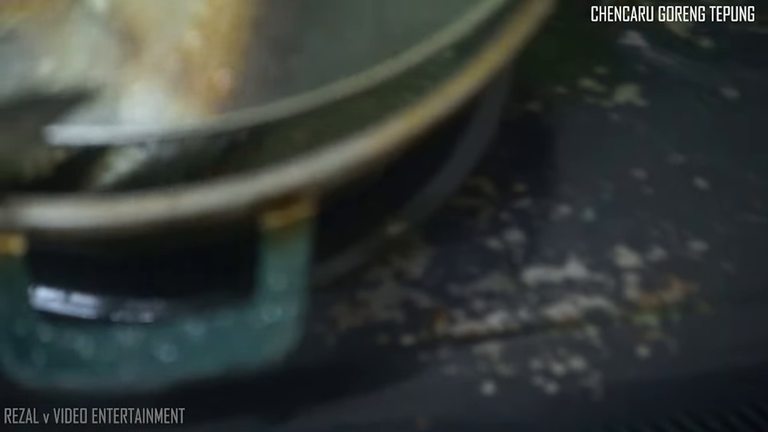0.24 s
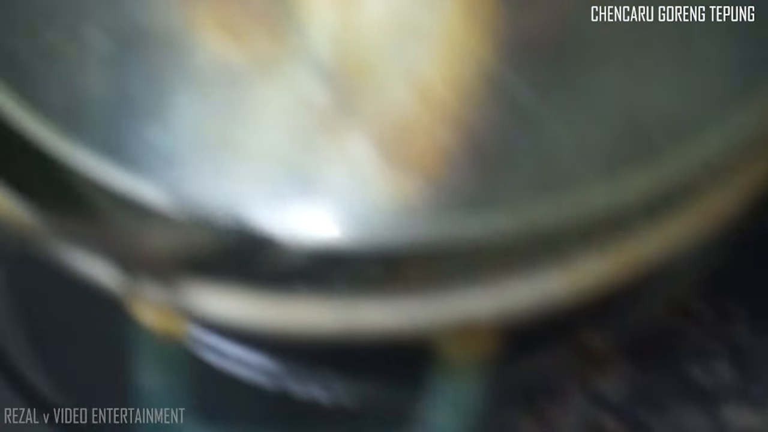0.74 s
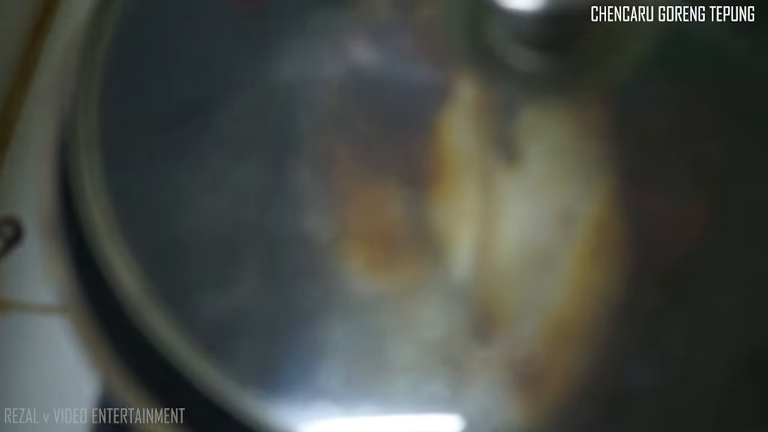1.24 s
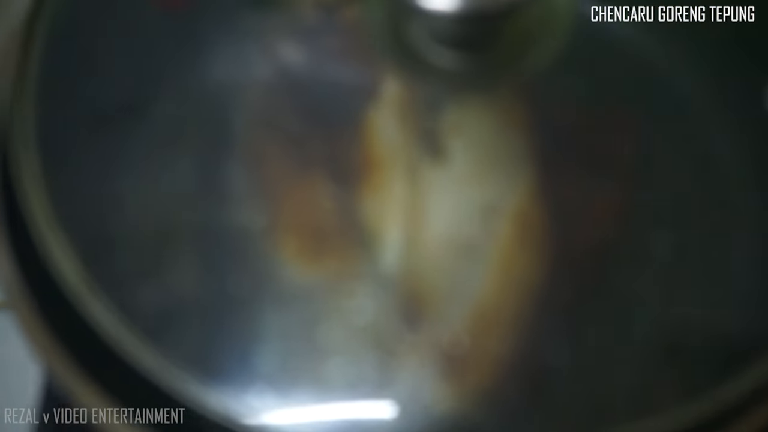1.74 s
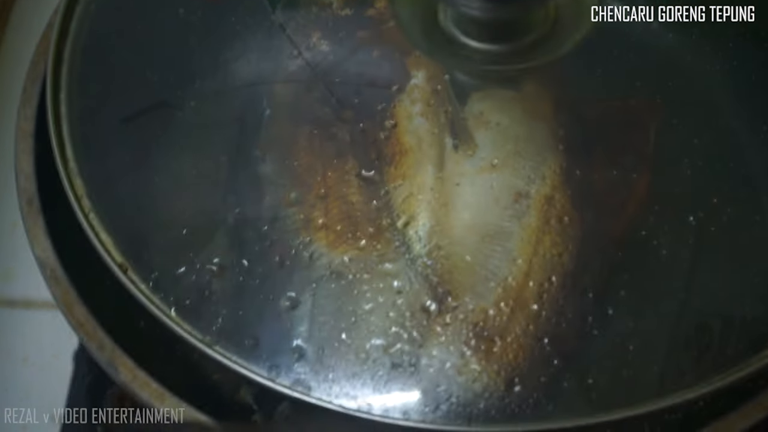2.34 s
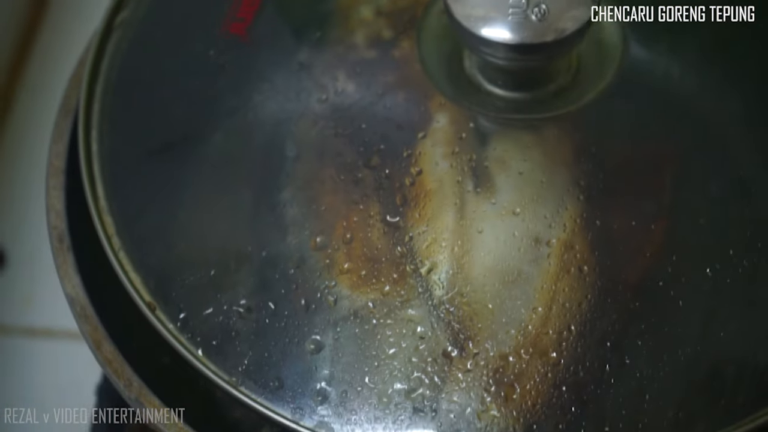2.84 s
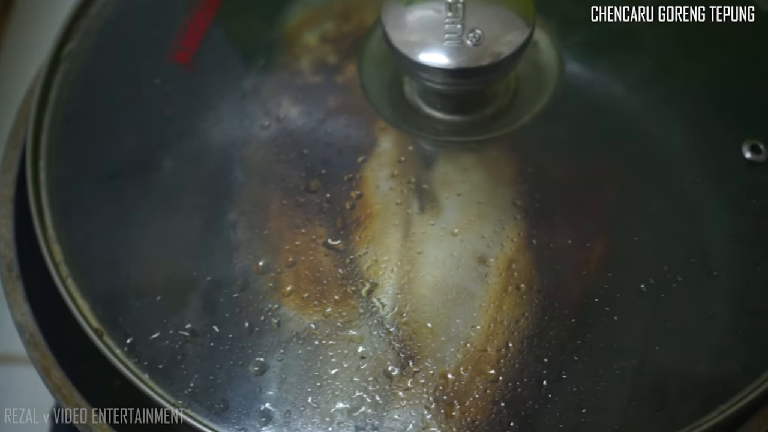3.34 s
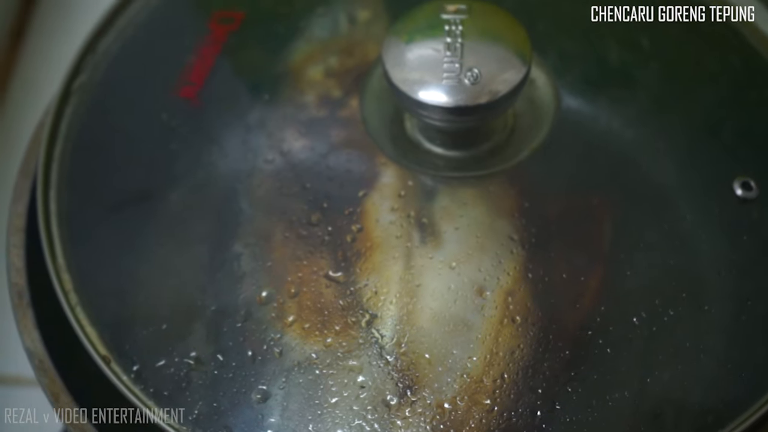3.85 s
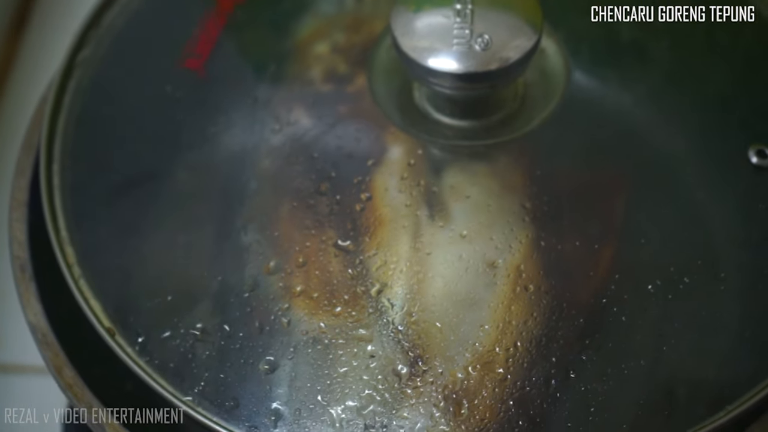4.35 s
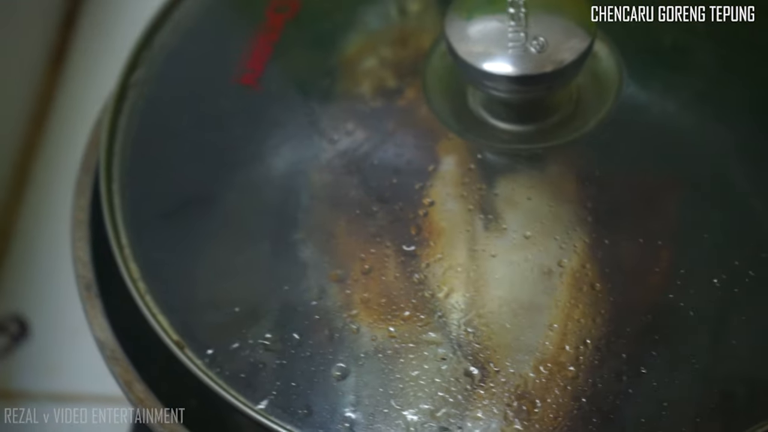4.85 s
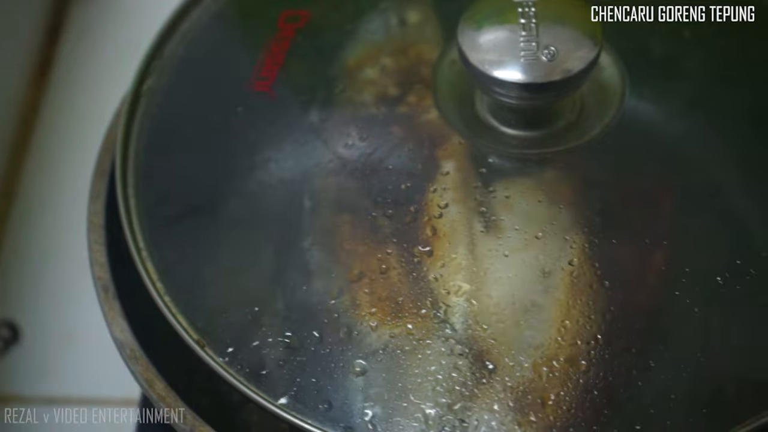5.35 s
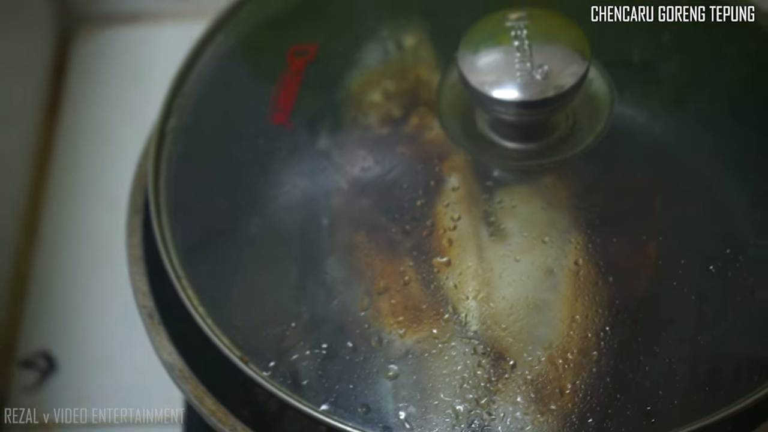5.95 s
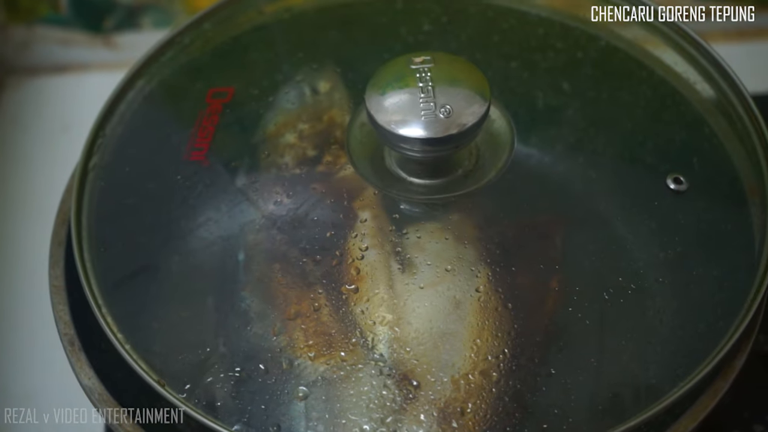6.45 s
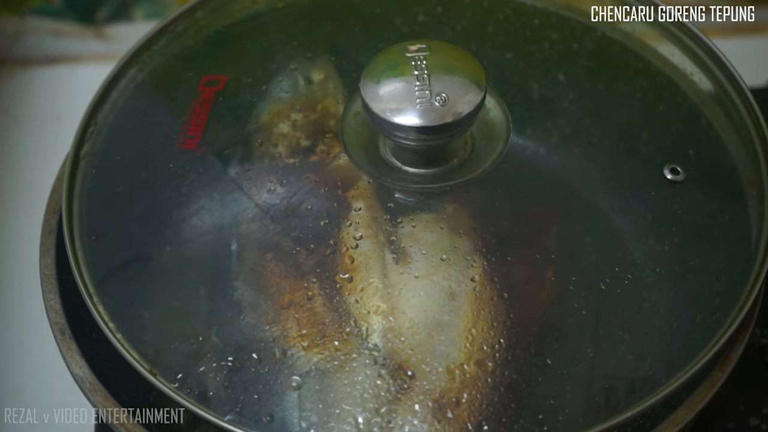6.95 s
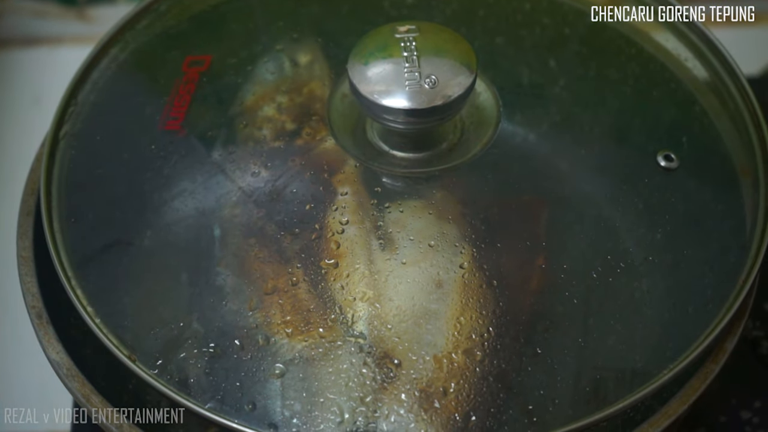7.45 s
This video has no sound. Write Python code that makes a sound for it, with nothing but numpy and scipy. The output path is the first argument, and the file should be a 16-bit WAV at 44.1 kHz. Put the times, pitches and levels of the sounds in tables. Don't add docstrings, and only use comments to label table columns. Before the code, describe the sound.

Battered fish fries in hot oil under a glass lid, close to a hand-held stereo microphone. From 0 to about 7.7 seconds the sizzle is continuous and dense: a low hollow gurgle and mid-range crackling coloured by the lid, with bright fizz and airy hiss escaping at the rim. Tiny ticks run all through it. Cracks and snapping droplets cluster in the first half second, again around 0.9 to 1.5, and thickly from 2.4 to 3.0, with a sharp spit near 3.1. Hollow water pops are strongest around 4.2 to 4.4 and at 5.25, followed by bright snaps from 5.4 to 5.9. Spray hiss rises a little around 6.3, then the boil eases slightly near 6.9 with sparser crackles, before a last few snaps near 7.5. Faint low kitchen noise and hum lie underneath.

```python
import sys
import numpy as np
from scipy import signal
from scipy.fft import rfft, irfft, next_fast_len
from scipy.io import wavfile
from scipy.ndimage import uniform_filter1d, map_coordinates

SR = 44100
rng = np.random.default_rng(int(sys.argv[2]) if len(sys.argv) > 2 else 0)


def ratio(d):
    e = np.asarray(d, float) / 20
    return 10 ** e


def to_wav(s):
    ch = np.atleast_2d(s).T
    pcm = np.round(np.clip(ch, -1, 1) * 32767)
    wavfile.write(sys.argv[1], SR, pcm.astype(np.int16))


N = 339565

# (time [s], strength [dB], size [0 small - 1 large])
WATER_POCKETS = [(0.0742, -34, 0.65), (0.2326, -27.5, 0.81), (0.4431, -24, 0.53), (0.9825, -26, 0.67),
                 (1.179, -21.5, 0.28), (1.556, -24, 0.54), (2.1082, -24, 0.33), (2.6297, -23, .2),
                 (2.8572, -30, 0.85), (2.9577, -25, .2), (3.1997, -24.5, .99), (3.5199, -24.5, 0.7),
                 (4.0519, -27, 0.74), (4.1923, -26, .05), (4.2101, -29, .05), (4.2229, -19.5, 0.56),
                 (4.3043, -19.5, 0.79), (4.3311, -25, 0.66), (4.4182, -25.5, .05), (6.8978, -28, .8),
                 (4.6399, -27.5, 0.91), (4.6851, -28, 0.87), (4.7797, -31, .4), (4.9102, -22, 0.4),
                 (5.2273, -24.5, .55), (5.249, -19, 0.93), (5.2621, -31, .75), (5.2773, -34.5, .95),
                 (6.7767, -28, 0.81), (7.3125, -29.5, 0.98)]
# (time [s], peak level [dB], pitch [Hz])
DROPLETS = [(0.2887, -7, 5550), (0.3721, -4, 5800), (0.4913, -8, 4770), (0.528, -6, 5240),
            (0.9118, -6, 6090), (0.9562, -7, 5760), (1.196, -4, 5700), (1.338, -5, 5630),
            (1.4736, -9, 5000), (1.9395, -7, 5700), (2.0293, -9, 5550), (2.141, -5.5, 5600),
            (2.2742, -7, 6800), (2.502, -8, 6250), (2.634, -2.5, 7520), (2.9198, -6, 7420),
            (2.9302, -9, 6240), (3.1807, -8, 5730), (3.2823, -9, 5550), (3.5054, -5, 5760),
            (4.344, -6, 8360), (5.367, -2, 5880), (5.678, -4, 6100), (5.7228, -7, 6340), (5.8356, -6, 5920),
            (5.912, -11, 5550), (6.131, -14, 5940), (6.9341, -9.5, 5560), (7.4285, -16, 5800),
            (7.512, -5, 5600)]
# (time [s], peak level [dB], pitch [Hz])
BLISTERS = [(0.1336, -10, 4130), (0.2046, -11, 2870), (0.2858, -9, 4800), (0.3555, -7, 4250),
            (0.4246, -18, 4560), (0.4419, -11, 3550), (6.56, -11, 2860), (0.9145, -10.5, 3610),
            (0.9826, -13, 2920), (1.4855, -8, 4150), (1.5544, -18, 2980), (2.417, -9, 4360),
            (2.593, -11, 3630), (2.6209, -10, 4230), (2.6555, -9, 4290), (2.833, -7, 4490),
            (2.8956, -6.5, 2870), (2.957, -8.5, 4430), (3.3273, -11, 2900), (3.8005, -12, 3540),
            (3.9384, -14, 4160), (4.2076, -13, 3000), (4.4713, -11, 2500), (4.509, -8.5, 3600),
            (4.6858, -6, 2850), (4.855, -12.5, 2540), (5.5428, -9, 4650), (6.2557, -13, 3550),
            (6.7506, -10.5, 4270), (7.5146, -11.5, 2980)]
# (time [s], left-right difference [dB], place [0 aside - 1 above])
CAMERA_SWING = [(0, 1, 0.53), (.6, -0.5, 0.49), (1.2, -2, 0.73), (1.9, -2, 0.86), (2.6, -2.1, 0.58),
                (3.4, -2, 0.71), (4.2, -1.5, 0.98), (4.9, -2.1, 0.77), (5.4, -2, 0.76), (6.2, -2.5, 0.43),
                (6.9, -1.8, 0.58), (7.7, -2, 0.56)]


def frying():
    # (frequency [Hz], level [dB])
    gurgle_spectrum = [(150, -8), (400, 0.5), (1700, -0.5), (2100, -3), (4000, -16.5), (16000, -73)]
    sizzle_spectrum = [(300, -72), (1500, -23), (2100, 0.5), (4600, 3.5), (5200, 6.5), (16000, -62)]
    fizz_spectrum = [(1000, -36), (4000, -14), (4900, -3.5), (5500, 2), (6200, 2), (6500, 0), (8500, -1.5),
                     (10000, -10.5), (16000, -44)]
    hiss_spectrum = [(3000, -56), (8000, -10), (9500, 1), (11000, -2), (13000, -3), (14500, -7),
                     (15800, -8)]
    shared = surges(70, 0.0084)
    gurgle_surge = ratio(1.48 * shared + 0.77 * surges(55, 0.012))
    sizzle_surge = ratio(2.07 * shared + 0.76 * surges(90, 0.0031))
    fizz_surge = ratio(0.73 * shared + 1.08 * surges(60, 0.011))
    hiss_surge = ratio(0.86 * shared + 1.1 * surges(60, 0.011))
    gurgle = shaped(bursts(3.4, 0.5) * gurgle_surge, gurgle_spectrum)
    sizzle = shaped(bursts(2.0, 0.77) * sizzle_surge, sizzle_spectrum)
    fizz = shaped(bursts(1.9, 0.83) * fizz_surge, fizz_spectrum)
    hiss = shaped(bursts(3.4, 0.83) * hiss_surge, hiss_spectrum)
    layers = [covered(patchy(gurgle, 1.24)), covered(patchy(sizzle, 1.68)), patchy(fizz, 1.0), hiss]
    return sum(1.269 * unit(layer) * ratio(db) for layer, db in zip(layers, levels()))


def bursts(spread_db, steam):
    size = rng.exponential(size=N)
    rare = rng.random(N) < .03
    pair = unit(scattered(rare * ratio(spread_db * np.minimum(size, 4.5))))
    bed = rng.standard_normal((2, N))
    return np.sqrt(1 - steam) * pair + np.sqrt(steam) * bed


def surges(rate, fade_s):
    settle_s = .3
    starts = (rng.random(N) < rate / SR) * rng.exponential(size=N)
    rush = uniform_filter1d(fading(starts, fade_s), size=45)
    return np.minimum(unit(rush - uniform_filter1d(rush, round(settle_s * SR))), 2.1)


def patchy(x, depth_db):
    z = signal.stft(x, nperseg=1024)[2]
    field = uniform_filter1d(rng.standard_normal(z.shape[1:]), size=5, axis=0)
    field = uniform_filter1d(field, size=25, axis=1)
    return signal.istft(z * ratio(depth_db * unit(field)), nperseg=1024)[1][:, :N]


def boil():
    # (time [s], strength [dB], large bubbles over small [dB], spray thrown to the rim [dB])
    boil_course = [(0, -24.5, 0.5, 0.5), (.45, -24.1, .4, -0.5), (.9, -23, -0.5, -2.5),
                   (1.35, -24.5, -1, -1.5), (1.8, -24, 0, -1), (2.25, -25, 0, -4), (2.7, -24.5, 0.5, -1),
                   (3.15, -23.5, -0.5, -1.5), (3.6, -23.5, 0.5, -.6), (4.0, -23.5, 1, -0.5),
                   (4.35, -23, 0.9, -0.5), (4.75, -23, 1, 1.5), (5.25, -24.5, 0.5, -1), (5.65, -23, -.5, 0),
                   (6.0, -24, -1.5, 1), (6.3, -23.5, 0.5, 2), (6.9, -26, 0, 0), (7.7, -23.5, -2.5, -2)]
    return [c - c.mean() for c in curves(boil_course)]


def levels():
    strength_db, large_db, spray_db = boil()
    cracked_db = churn(BLISTERS, 2.5, 0.023)
    spat_db = churn(DROPLETS, 1, 0.015)
    popped_db = churn(WATER_POCKETS, 2.5, 0.049)
    gurgle_db = -36.68 + 0.55 * strength_db + large_db + popped_db + 0.69 * cracked_db
    sizzle_db = -28.8 + 1.03 * strength_db + 1.3 * large_db + cracked_db + .5 * popped_db
    fizz_db = -24.8 + strength_db + spat_db + .4 * cracked_db
    hiss_db = -28.6 + strength_db + spray_db + .7 * spat_db
    return [db + 0.5 * wobble(7) for db in (gurgle_db, sizzle_db, fizz_db, hiss_db)]


def churn(events, swell_db, fade_s):
    s, db = np.transpose(events)[:2]
    kicks = np.bincount(np.round(s * SR).astype(int), ratio(db - db.max()), N)
    return swell_db * uniform_filter1d(fading(kicks, fade_s), size=220)


def lid(hz):
    # (frequency [Hz], width [Hz], level heard from aside [dB], level heard from above [dB])
    air_modes = [(394.6, 23, -11, -9), (444.5, 28, -8, -5.5), (491, 33, -1, -6), (550, 51, -3.5, -10),
                 (606, 21, -9, -9.5), (654, 65, -12, -11), (1060, 126, 3.5, -2), (1112, 67, 3, 4.5),
                 (1211, 130, -8.5, -5), (1619, 117, -12, 5), (1698, 70, -9, 5.5), (1927, 75, 2, -3),
                 (2260, 46, -1.5, -2.5), (2566, 167, -1.5, 2.5), (2733, 28, 7, 4.5), (2860, 174, 7, -1),
                 (2980, 76, -20, 3), (3484, 260, 0.5, -2.5), (3610, 80, 6, 2), (3920, 220, 0.5, -2.5),
                 (4150, 210, -1, -1.5), (4360, 260, 1, -0.5), (4720, 190, 1, -2)]
    # (frequency [Hz], level [dB])
    lid_leak = [(150, -40), (300, -22.5), (800, -15.5), (1400, -14.5), (2100, -6), (3200, -7),
                (5000, -14.5)]
    power = ratio(along(lid_leak, hz)) ** 2
    for mode_hz, width_hz, aside_db, above_db in air_modes:
        response = 1 / (1 + ((hz - mode_hz) / (width_hz / 2)) ** 2) ** 2
        power = power + ratio([[[aside_db]], [[above_db]]]) ** 2 * response
    return np.sqrt(power)


def covered(x):
    height = curves(CAMERA_SWING)[1]
    aside, above = coloured(x, lid)
    return (1 - height) * aside + height * above


def pockets():
    per_s, usual_db, growth = 4.2, -36, 1.9
    when, loud, size = rng.random((round(per_s * N / SR), 3)).T
    strength_db, large_db, _ = boil()
    coarse_db = (strength_db + large_db)[(when * N).astype(int)]
    lesser_db = usual_db + growth * coarse_db + 4 * (loud - .5)
    lesser = np.transpose([when * (N - 1) / SR, lesser_db, 0.62 * size])
    return np.vstack([WATER_POCKETS, lesser]).T


def pops():
    # (from [Hz], to [Hz], response [dB], loss for the smallest pocket [dB])
    mode_groups = [(181, 800, .5, 31), (850, 1590, 6, 8.5), (1425, 1840, 7.5, 1.6)]
    s, strength_db, size = pockets()
    at = np.round(s * SR).astype(int)
    t = np.arange(SR // 40) / SR
    out = 0
    for low_hz, high_hz, response_db, small_loss_db in mode_groups:
        blow = ratio(strength_db + response_db - small_loss_db * (1 - size))
        blows = np.zeros((2, N))
        blows[:, at] = blow * rng.normal([[1], [0]], [[0], [.6]], (2, len(s)))
        puff = ratio(-27.5 - 60 * t / 0.037) * rng.standard_normal(len(t))
        push = np.pad((t == 0) + puff, (0, SR // 8))

        def group_gain(f):
            return lid(f).mean(0)[0] ** 1.2 * above(f, low_hz, 8) * below(f, high_hz, 8)

        ring = coloured(push, group_gain)
        out = out + signal.fftconvolve(blows, ring[None] / np.abs(ring).max(), axes=1)[:, :N]
    return 0.98 * out


def spits():
    drops = coloured(snaps(DROPLETS, .005, .03, 3.5), lambda f: above(f, 2500))
    cracks = coloured(snaps(BLISTERS, 0.0057, 0.044, 2.4), lambda f: above(f, 1500))
    return ratio(4) * covered(cracks) + ratio(-3) * drops


def snaps(events, ring_s, hush_s, spray_db):
    out, t = np.zeros((2, N + SR)), np.arange(SR // 20) / SR
    for s, db, hz in events:
        tone = np.sin(2 * np.pi * hz * t)
        snap = ratio(-60 * t / ring_s) * rng.normal([[1], [0]], [[0], [.5]])
        noise = uniform_filter1d(rng.standard_normal((2, len(t))), size=7)
        spray = ratio(spray_db - 60 * t / hush_s) * noise
        out[:, round(s * SR):][:, :len(t)] += ratio(db) * (snap + spray) * tone
    return out[:, :N]


def ticks():
    struck = (rng.random(N) < 180 / SR) * ratio(2.2 * np.minimum(rng.exponential(size=N), 3.5))
    cycles = coloured(scattered(struck), lambda f: above(f, 4200) * below(f, 12500))
    return ratio(boil()[0] - 7.5) * cycles


def flashes():
    # (time [s], peak level [dB])
    steam_flashes = [(0.2713, -12), (0.3716, -12), (0.5033, -11), (0.624, -18), (0.6539, -6), (1.071, -9),
                     (1.2565, -14), (1.3374, -12), (1.4735, -9), (1.9674, -13), (2.2613, -20),
                     (2.5541, -11), (2.6334, -9), (2.9198, -8), (3.0694, 0), (3.2475, -19), (3.2804, -12),
                     (4.0312, -16), (4.2787, -10), (4.808, -9), (5.0484, -8), (5.2854, -8), (5.3667, -10),
                     (5.7214, -14), (5.9958, -10.5), (6.0377, -10), (6.2018, -11), (7.4285, -7)]
    s, db = np.transpose(steam_flashes)
    struck, t = np.zeros((2, N)), np.arange(SR // 40) / SR
    strength = ratio(db + 4)
    struck[:, np.round(s * SR).astype(int)] = strength * rng.normal([[1], [0]], [[0], [.5]], (2, len(s)))
    puff = (t == 0) + ratio(-12 - 60 * t / .02) * rng.standard_normal((2, len(t)))
    train = signal.fftconvolve(struck, puff, axes=1)[:, :N]
    return coloured(train, lambda f: above(f, 3000) * below(f, 13000))


def kitchen():
    # (frequency [Hz], density [dB per Hz])
    room_spectrum = [(12, -69), (20, -37), (49, -34), (91, -12.5), (151, -16), (213, -3.5), (332, -4.5),
                     (380, -9), (490, -23), (840, -120)]
    # (frequency [Hz], rms level [dB])
    hum_tones = [(100, -74.5), (118, -75.5)]
    t = np.arange(N) / SR
    hum = 0
    for hz, db in hum_tones:
        phase = 2 * np.pi * hz * t + .6 * wobble(3.5)
        hum = hum + ratio(db + 3.0 + 2.5 * wobble(6)) * np.sin(phase)
    air = unit(shaped(rng.standard_normal((2, N)), room_spectrum))
    return ratio(-58.5) * air + hum * [[1], [0]]


def ports(pair):
    # (frequency [Hz], left-right likeness [0-1])
    likeness = [(60, 1), (130, 0.99), (290, 0.9), (640, 0.84), (1410, 0.75), (3100, 0.49), (6820, 0.51),
                (15000, 0.14)]

    def angle(f):
        return np.arccos(along(likeness, f)) / 2

    mid = coloured(pair[0], lambda f: np.cos(angle(f)))
    side = coloured(pair[1], lambda f: np.sin(angle(f)))
    return np.array([mid + side, mid - side])


def scattered(struck):
    place = rng.standard_normal((2, N))
    return struck * [np.sign(place[0]), place[1]]


def fading(kicks, fade_s):
    return signal.lfilter([1], [1, -np.exp(-1 / (fade_s * SR))], kicks)


def unit(x):
    return x / np.sqrt(np.mean(x ** 2) + 1e-20)


def along(points, hz):
    f, v = np.transpose(points)
    return np.interp(np.log(hz + 1), np.log(f + 1), v)


def curves(rows):
    s, *cols = np.transpose(rows)
    return [np.interp(np.arange(N) / SR, s, c) for c in cols]


def wobble(rate):
    return map_coordinates(rng.standard_normal(2000), [np.arange(N) * rate / SR])


def above(f, corner_hz, order=4):
    return 1 / (1 + (corner_hz / (f + 1)) ** order)


def below(f, corner_hz, order=4):
    return 1 / (1 + (f / corner_hz) ** order)


def coloured(x, gain):
    m = 2 ** 14
    ceps = irfft(np.log(gain(np.fft.rfftfreq(m, 1 / SR)) + 1e-6), m)
    ceps[..., 1:m // 2] *= 2
    ceps[..., m // 2 + 1:] = 0
    response = irfft(np.exp(rfft(ceps)), m)
    size = next_fast_len(x.shape[-1] + m)
    return irfft(rfft(x, size) * rfft(response, size), size)[..., :x.shape[-1]]


def shaped(x, spectrum):
    return coloured(x, lambda f: ratio(along(spectrum, f)))


def scene():
    lean_db = curves(CAMERA_SWING)[0]
    stove = ports(frying() + pops() + spits() + ticks() + flashes())
    return stove * ratio(np.array([lean_db, -lean_db]) / 2) + ports(kitchen())


def top_cut(x):
    return signal.sosfilt(signal.butter(12, 17020, fs=SR, output="sos"), x)


def record(dry):
    held = dry / (1 + np.abs(dry / .8) ** 4) ** (1 / 4)
    bass_hz, top_hz = 45, 15750
    hz = np.fft.rfftfreq(N, 1 / SR)
    passed = (hz < top_hz) * hz ** 2 / (hz ** 2 + bass_hz ** 2)
    return top_cut(irfft(rfft(held) * passed, N))


dry = scene()
out = record(dry)
to_wav(out)
```